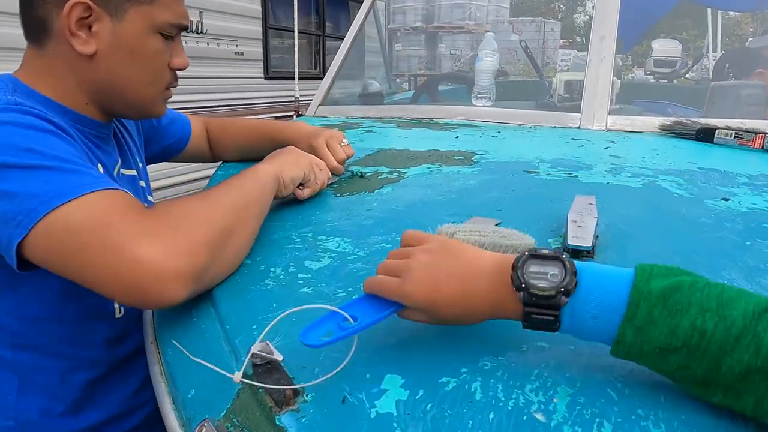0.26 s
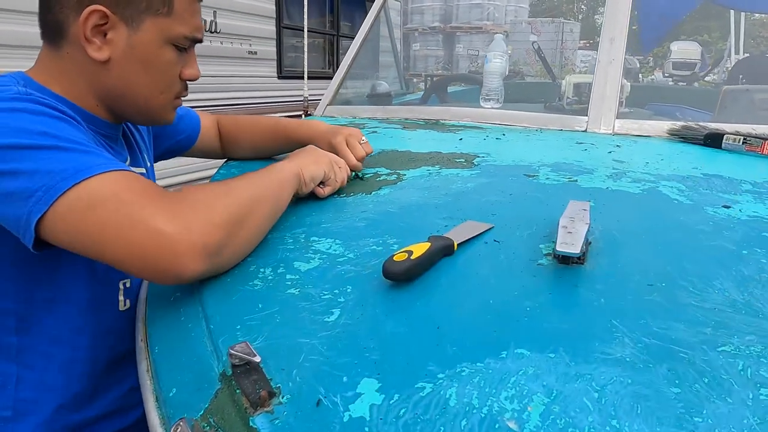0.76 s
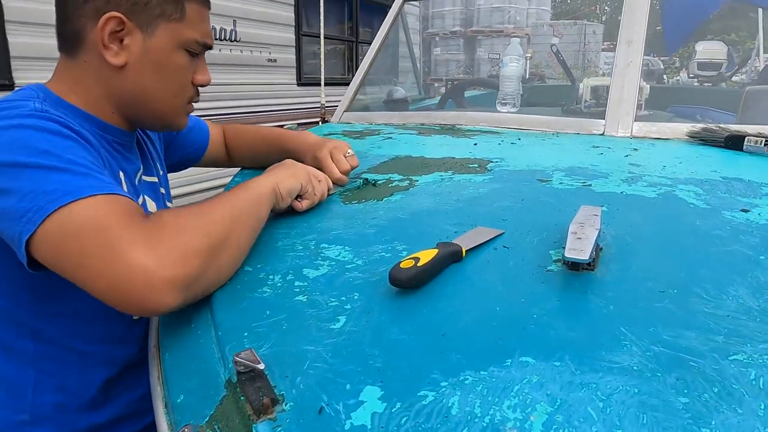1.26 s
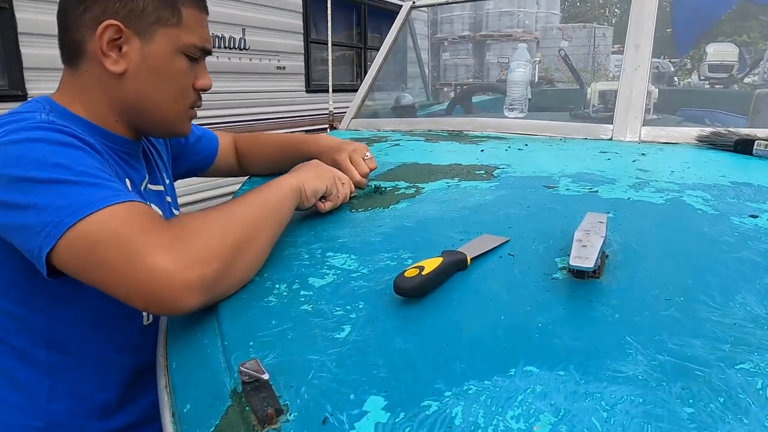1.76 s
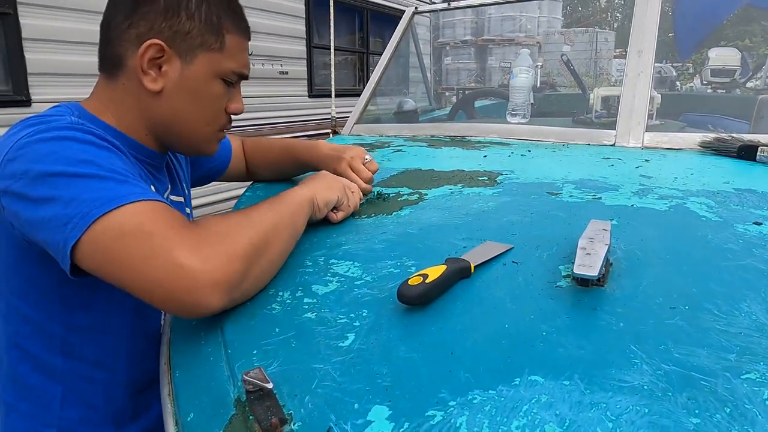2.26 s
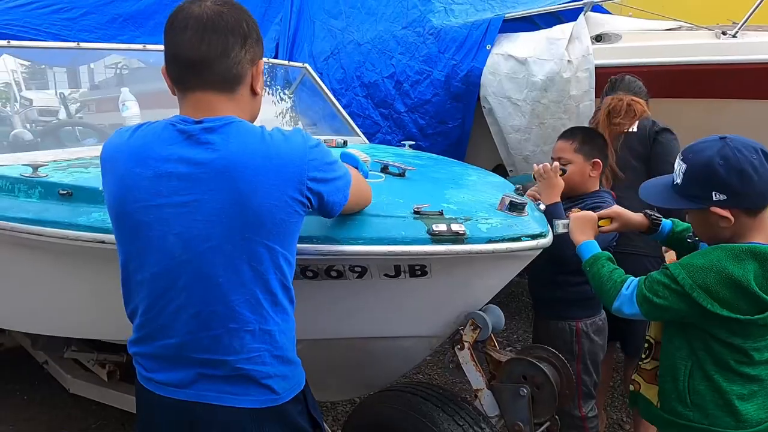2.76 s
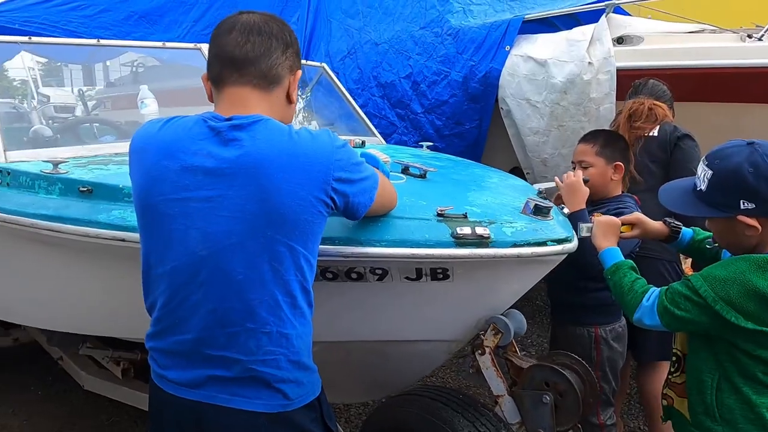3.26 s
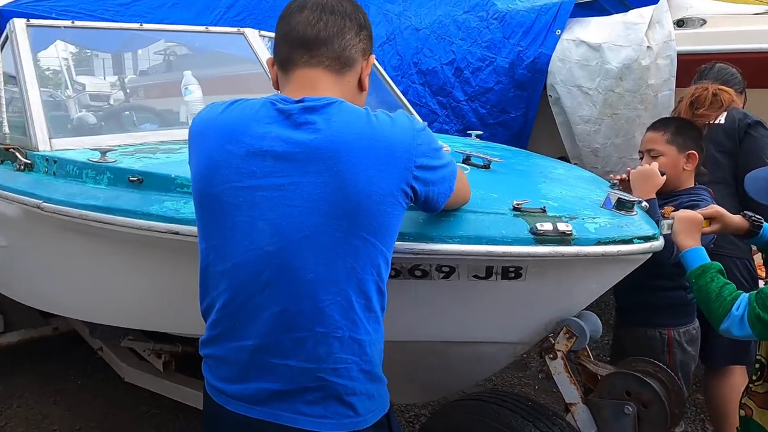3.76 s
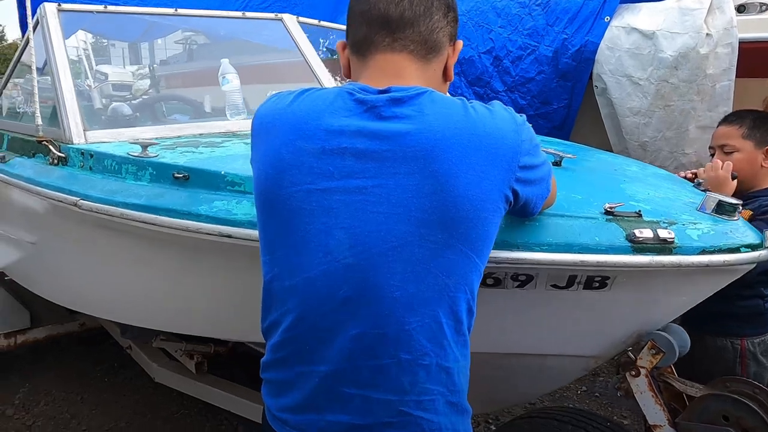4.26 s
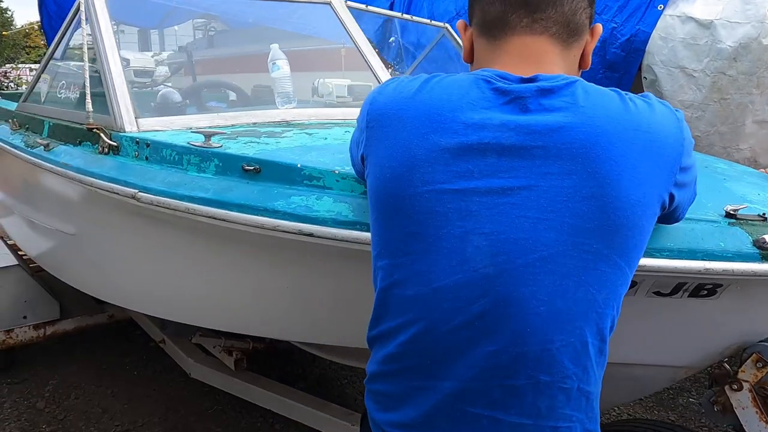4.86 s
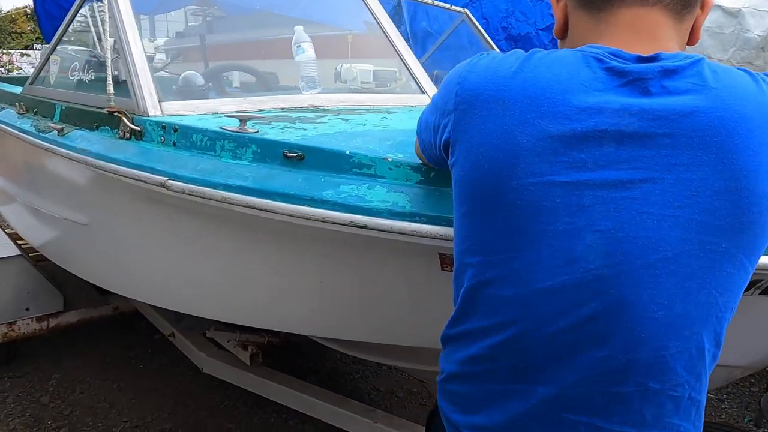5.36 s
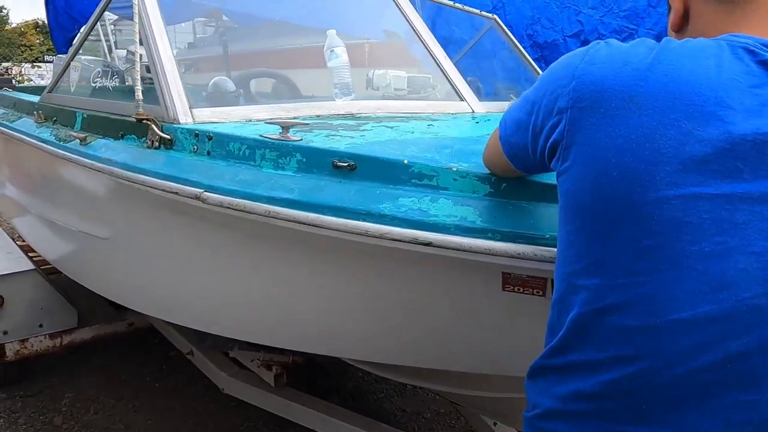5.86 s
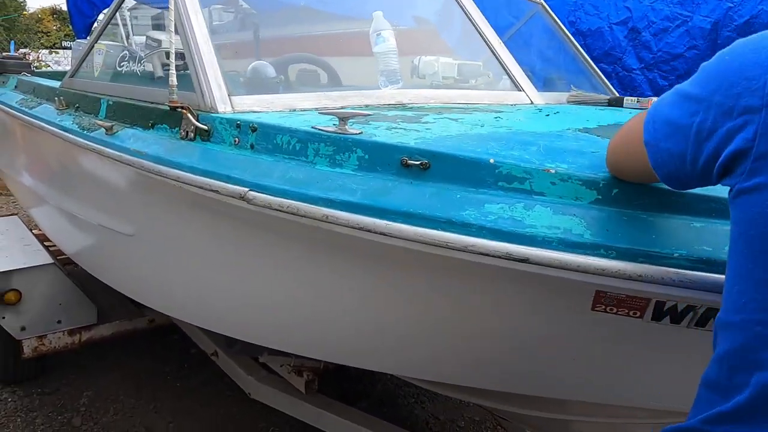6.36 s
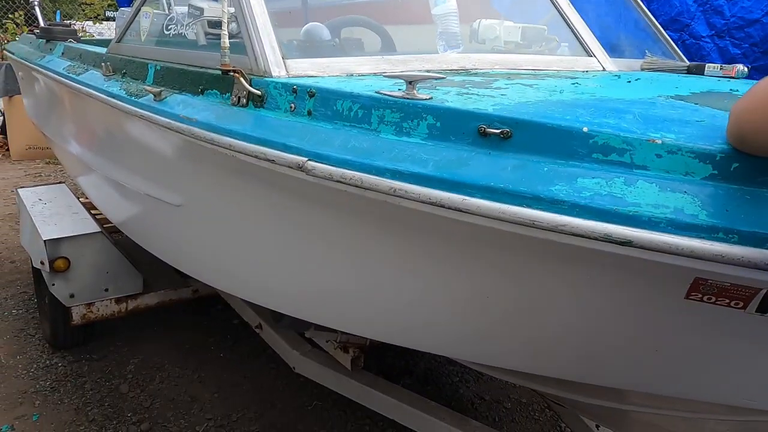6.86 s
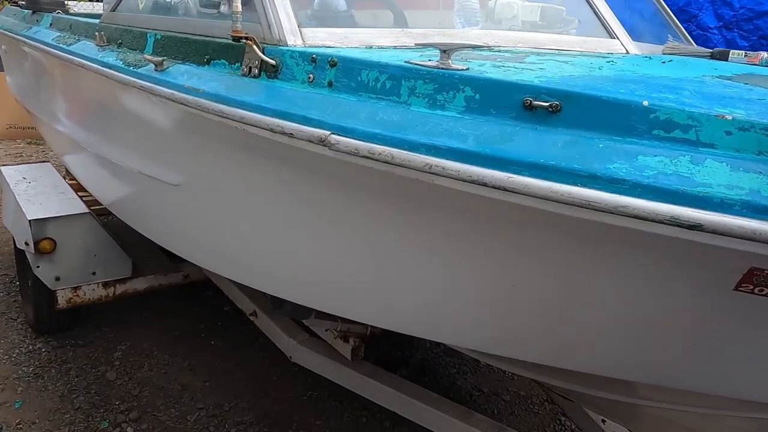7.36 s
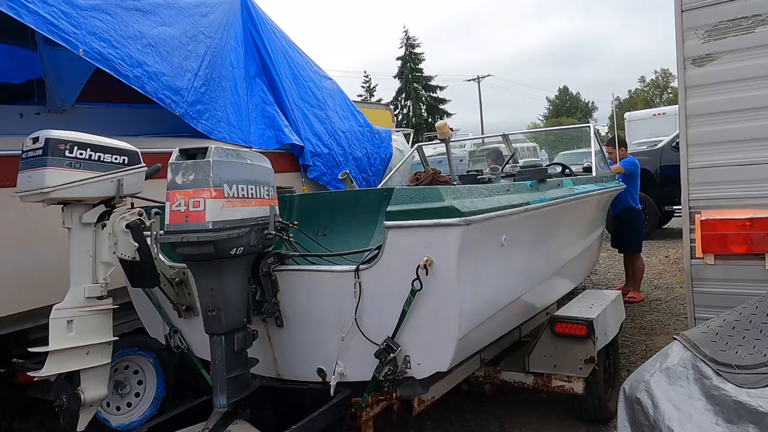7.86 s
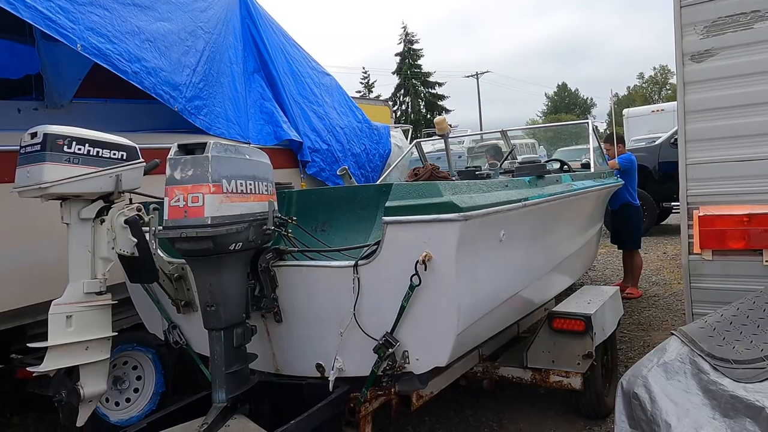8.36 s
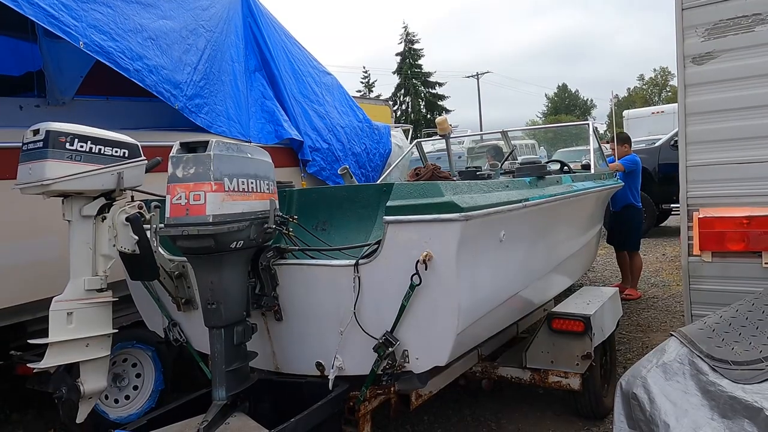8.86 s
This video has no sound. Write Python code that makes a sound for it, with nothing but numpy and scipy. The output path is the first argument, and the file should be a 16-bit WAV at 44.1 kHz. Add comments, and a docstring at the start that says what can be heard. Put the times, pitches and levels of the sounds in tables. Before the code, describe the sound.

Dry, crackly hand scraping on hollow fibreglass outdoors, briefly cut by silence, continues softer with one knock, then fainter from the stern over traffic.

```python
"""From the start traffic rumbles and hums over an outdoor yard: shaped noise and sliding sines.
Beside the hands, a blade scrapes old paint off a fibreglass boat deck: click noise gated by strokes,
with cracks of flakes, brief singing and booming tones and stick-slip judder, all through resonances.
After a short silence, from behind the worker: softer scraping and a knock on the hollow hull, as ringing noise.
After a brief dip in level, from the stern: faint scraping, low booms and a differently coloured tyre wash."""
import sys
import numpy as np
from scipy import signal
from scipy.fft import rfft, irfft, next_fast_len
from scipy.io import wavfile
from scipy.ndimage import uniform_filter1d

SR = 44100
rng = np.random.default_rng(int(sys.argv[2]) if len(sys.argv) > 2 else 0)


def bounce(signal):
    """Save signal as a 16-bit WAV file at the path given by the first command-line argument."""
    frames = np.transpose(np.atleast_2d(signal))
    limited = np.clip(frames, -1, 1)
    pcm = np.round(limited * 32767).astype(np.int16)
    wavfile.write(sys.argv[1], SR, pcm)


N = 402187
SIZE = next_fast_len(N, True)
TIME_S = np.arange(N) / SR
BIN_HZ = np.fft.rfftfreq(SIZE, 1 / SR)

# All levels are relative: each layer adds its own gain.
# Traffic rumble spectrum. Each row: frequency in Hz, density in dB per Hz.
RUMBLE_SPECTRUM_DB = [(8, -16.5), (14, -6.5), (28, -3), (40, -4), (48, 4), (55, 7), (63, 0.5), (72, 3.5),
                      (84, 3.5), (95, -6), (112, -6.5), (140, -15.5), (220, -25), (500, -82.5)]
# Rumble level. Each row: time in seconds, level in dB.
RUMBLE_LEVEL_DB = [(0, -33.5), (2.1, -40), (2.25, -34.5), (2.65, -27), (3.2, -27), (3.7, -30), (5.3, -31),
                   (6.3, -28.5), (7.8, -28), (7.92, -35), (8.5, -32), (8.7, -33.5), (9.1, -34.5)]
# Tyre wash spectra at the three places. Each row: frequency in Hz, density in dB per Hz.
WASH_DECK_DB = [(88, -7.5), (150, -3), (198, -12.5), (363, -11), (424, -21.5), (495, -13), (642, -12),
                (737, -12.5), (955, -10), (1220, -13.5), (1370, -17.5), (9380, -58.5), (12200, -58.5),
                (20600, -120)]
WASH_SIDE_DB = [(88, -17.5), (150, -5), (300, -5.5), (400, -6), (520, -8), (720, -4.5), (1010, -5.5),
                (1750, -18), (3200, -28.5), (5700, -38.5), (8000, -46.5), (9400, -51), (11500, -86),
                (16000, -110)]
WASH_STERN_DB = [(88, -31), (150, -12.5), (175, -11.5), (235, -10), (285, -15.5), (350, -12), (389, -10.5),
                 (478, -17), (559, -13.5), (818, -11), (907, -5.5), (1840, -21), (4500, -43.5), (9380, -66),
                 (12200, -93), (20600, -120)]
# Tyre wash level. Each row: time in seconds, level in dB.
WASH_LEVEL_DB = [(0, -38), (1.2, -39), (2.3, -39.5), (2.6, -38), (3.7, -41.5), (6, -42.5), (6.8, -42.5),
                 (7.83, -43), (7.9, -38), (8.5, -40), (9.1, -39)]
# Distant hums and whines. Each row: start and length in seconds, first and last pitch in Hz, level in dB.
HUM_ROWS = [(-.15, 0.59, 98, 104.3, -38), (0.501, 0.73, 121, 111.6, -36), (1.653, 0.4, 84.1, 84.8, -35.5),
            (2.551, 0.95, 773, 786, -49), (3.298, 0.65, 267.6, 261, -40), (5.018, 0.27, 716, 724, -43),
            (6.211, 0.4, 232.7, 222, -49), (6.945, 0.96, 216.8, 206.5, -46.5), (7.919, 0.11, 727, 721, -45),
            (8.409, 0.063, 720, 716, -47), (7.846, 0.61, 82.04, 80, -43), (8.421, 0.9, 80.44, 81.8, -30),
            (8.5, 0.98, 167.5, 164.5, -49.5)]
# Pushes of the blade. Each row: start and length in seconds, level in dB, build-up from start to end in dB,
# extra top treble in dB, extra deck body in dB.
STROKE_ROWS = [(-.02,.11,-43.5,-15,5.5,5), (0.19,.26,-47.5,0,-2,1), (0.624,0.093,-35,4,-3.5,1.5),
               (0.724,0.052,-35.5,6,3,1.5), (0.751,0.06,-32.5,5,1,1), (0.803,.025,-52,-7.5,3,7.5),
               (1.009,0.11,-42.5,-2,-6,1.5), (1.221,0.05,-53,4,4,10), (1.324,0.045,-32,-6,-6.5,0),
               (1.37,0.024,-43,-6,3,5), (1.401,0.075,-34.5,-3,0,0), (1.463,0.067,-31.5,9,-0.5,-1),
               (1.533,0.099,-41,-5,2,4), (1.754,.12,-46,-5,-1.5,3.5), (1.968,0.036,-47,-3,10,10),
               (2.153,0.0066,-36,-2,-7,1.5), (2.176,0.0078,-37.5,-3,5,-1), (2.204,0.031,-38.5,-2,-2,2.5),
               (2.27,0.071,-28.5,6,1.5,1.5), (2.348,0.062,-37,-18,2,-3.5), (2.721,0.1,-51,0,-7,3),
               (2.865,0.072,-47.5,-4,-6,4), (3.042,0.03,-50,8,1.5,-1), (3.252,0.026,-45,-4,1,-3),
               (3.469,0.074,-52.5,-6,0.5,-3), (3.769,0.043,-47,0,-7,-1.5), (4.05,0.12,-50,1,-10,-3),
               (4.166,0.047,-50.5,4,-8,4.5), (4.304,0.08,-45.5,-4,-1,0), (4.457,0.12,-55.5,-4,-5,1.5),
               (4.58,0.13,-46.5,-18,-7.5,-4), (4.695,0.082,-58,-3,1,-1), (4.78,0.11,-52.5,10,2,0),
               (4.93,0.087,-57,0,5,7), (5.003,0.2,-48,2,0.5,2), (5.187,0.081,-51.5,-6,-3,0),
               (5.36,0.039,-45,8,2,3), (5.458,0.025,-46,-3,-10,3.5), (5.49,0.053,-57,0,6,8),
               (5.586,0.069,-47.5,-8,1,1), (5.784,.13,-51.5,-6,3,-6), (6.048,0.054,-53,16,-23,6),
               (6.255,0.069,-49.5,-4,5,2), (6.388,.027,-50.5,-11,-2,5), (6.477,0.072,-49,-9,2.5,0.5),
               (6.651,.097,-50.5,-3,-5,2.5), (6.745,0.053,-49.5,3,4,4), (6.985,0.068,-46.5,-1.5,3.5,6),
               (7.108,.065,-62.5,0,7,12), (7.24,0.062,-41,4.5,3,-1.5), (7.396,.04,-63,-6,7,14),
               (7.518,0.079,-45.5,-2,-3,2), (7.973,0.073,-52.5,-1,-3,8), (8.135,0.098,-48.5,9.5,-0.5,-1),
               (8.215,0.1,-53.5,7,4.5,4.5), (8.32,.08,-64,-6,-7,10), (8.52,0.033,-59,-4,-20,10),
               (8.606,0.046,-55,-2,-19,4)]
# Blade dragging lightly between strokes. Each row: time in seconds, level in dB.
DRAG_LEVEL_DB = [(0, -65), (1.7, -55.5), (2.4, -71), (3.8, -72), (4.5, -61), (6.1, -58), (6.6, -68.5),
                 (7.6, -60.5), (8.4, -70.5), (9.1, -62.5)]
# Blade's rasp before its resonances. Each row: frequency in Hz, density in dB per Hz.
RASP_SPECTRUM_DB = [(40, -15.5), (100, 2.5), (170, 8.5), (290, 0.5), (400, 2.5), (500, 0.5), (620, 0.5),
                    (900, 1), (1500, 0.5), (2400, -7), (4200, -7), (6200, -11.5), (9300, -18),
                    (10000, -25.5), (13000, -34), (15500, -51)]
# Resonances of deck and blade. Each row: frequency in Hz, width in Hz, lift in dB.
MODE_ROWS = [(750, 89, 0.5), (804, 110, 0.5), (1250, 13, 1.5), (2000, 100, 2), (2700, 74, 4),
             (3840, 620, 1.5), (4400, 160, 3.5), (5060, 210, 1), (7300, 260, 6), (8060, 930, 6)]
# Shading by the worker's body. Each row: frequency in Hz, gain in dB.
SHADE_DB = [(150, -3.5), (250, 2), (400, 2), (800, 4), (1600, 0.5), (2400, 2.5), (3200, 3.5), (3900, 0.5),
            (4400, -1.5), (5700, 1), (8500, -5.5), (10500, -2), (13000, 0.5)]
# Deck's lowest drum modes. Each row: frequency in Hz, density in dB per Hz.
DRUM_SPECTRUM_DB = [(70, -37.5), (130, 0.5), (160, -7), (240, -0.5), (330, -32.5), (600, -81.5)]
# Short cracks: flakes snapping off, but only faint ticks of no given source at 3.254 and 8.528 seconds.
# Each row: time in seconds, level in dB, decay time in ms, pitch in Hz, extra bass in dB.
CRACK_ROWS = [(0.0312,-14.5,4.7,2730,-13.5), (.061,-33,2,8000,-13), (.178,-30,2.1,2000,-15),
              (0.226,-39,1.5,3300,0), (.282,-42.5,3.8,950,22.5), (.322,-26,3.2,4550,1),
              (.36,-34,1.5,7800,-6), (0.374,-38,2,8000,-1), (.387,-20,1,4740,-3), (0.416,-27,.9,4580,3),
              (.509,-29,1.4,4400,-2), (.609,-27,4,4600,2.5), (0.6347,-28,2.5,2100,-2),
              (0.658,-35,1.9,4000,4), (.664,-24,3.4,3800,-3), (.68,-28,1.8,5000,0), (0.69,-23,3.4,4180,-4),
              (.699,-24.5,2.5,5300,4), (0.7157,-24.5,3.1,7040,3), (.736,-23.5,2.7,7500,1),
              (0.753,-31,2,3880,-3), (0.769,-28,3.6,3880,-9), (0.786,-28.5,1.8,4200,-7),
              (0.7926,-16.5,5.3,3770,-8.5), (0.8015,-17.5,4,3900,-5.5), (.806,-23,2.6,3300,7),
              (.858,-44,1.2,8000,-5), (.998,-20,1.3,4130,9.5), (1.246,-31.5,2.7,6960,-13),
              (1.359,-28,1.8,6500,0), (1.418,-30,2.2,4300,-10), (1.443,-30,2.5,7800,-9),
              (1.464,-15.5,1.9,7800,-4), (1.467,-24,1.6,7800,-6), (1.493,-23,3.5,3800,-10),
              (1.5173,-19.5,6.1,3960,-5), (1.53,-22,5.9,7000,-2), (1.551,-32,1.8,4300,3),
              (1.58,-37,1.5,6000,-5), (1.59,-25,1.5,8500,-9), (1.607,-21.5,2.1,4550,-13),
              (1.66,-38,5.7,1930,9), (1.677,-34,1,8000,-10), (1.76,-42.5,6,940,20.5),
              (1.961,-31.5,8.2,6000,-8), (1.971,-32.5,13,6030,11), (2.174,-26.5,4.6,3760,1),
              (2.1949,-19,3.2,3420,-0.5), (2.209,-28,2.1,1900,9), (2.215,-24,3.6,3220,3.5),
              (2.2717,-27.5,4.7,3000,6.5), (2.289,-30,2.7,5200,4.5), (2.301,-22,2.5,3000,6),
              (2.3125,-20.5,2.4,2700,1.5), (2.331,-24.5,2.5,3950,0), (2.343,-19,4.5,7560,-5.5),
              (2.37,-28.5,1.4,3300,4), (2.736,-39.5,5.5,3000,-8), (2.787,-45,4,3500,1),
              (3.254,-32.5,5.9,2600,-1.5), (3.476,-36.5,5.6,3000,-9), (4.085,-48,5.1,4800,10),
              (4.597,-42,5.9,5000,-4), (4.859,-43,5.3,3800,2), (5.458,-39.5,5.4,2600,-4),
              (5.843,-38,5.1,5000,-2), (6.341,-44.5,9.9,6000,-8), (8.195,-39,4.1,3520,5),
              (8.528,-50,4.4,1100,11)]
# Blade singing. Each row: middle and length in seconds, first and last pitch in Hz, level in dB.
SING_ROWS = [(.345,0.072,4700,4600,-48), (.782,0.061,4060,3670,-35), (1.5,.1,7270,8100,-41),
             (2.21,.065,3770,3150,-39), (2.332,.07,7200,7300,-35.5), (2.315,0.12,3600,4250,-37.5),
             (2.305,.085,4950,5440,-43), (2.305,0.12,1450,1342,-31.5), (2.305,0.091,847,978,-28.5),
             (4.1,0.062,4840,5000,-55.5), (5.15,0.056,7960,7960,-53), (5.469,.04,5300,5300,-55),
             (7.277,0.065,7760,7760,-53)]
# Deck booming as it is leant on and let go. Each row: middle and length in seconds, first and last pitch
# in Hz, level in dB.
BOOM_ROWS = [(.705,0.19,161.4,175.6,-26.5), (.82,.06,236,170,-26.5), (1.51,.06,177,167,-28.5),
             (2.235,0.087,160.5,89.7,-31), (2.36,0.082,193.3,141,-30), (5.17,0.2,190.7,168,-43),
             (8.175,.15,237,210.5,-34), (8.205,0.15,389,373,-39), (8.28,0.19,311,285,-40),
             (8.37,.13,235,180,-41)]
# Blade juddering on hard pushes. Each row: middle and length in seconds, first and last rate in Hz, level in dB.
JUDDER_ROWS = [(0.777,.06,555,693,-50), (1.338,.061,1304,1420,-31), (2.216,.09,621.6,595,-28.5),
               (2.324,.13,621.4,699,-31.5), (3.26,.06,785,718,-41), (5.054,.13,2410,2260,-40.5),
               (5.46,.06,2600,2480,-43.5), (7.273,.062,779,827,-40.5)]
# Knock on the hull with its rebound. Each row: time in seconds, level in dB.
KNOCK_ROWS = [(2.884, -16.5), (2.889, -21), (2.911, -29)]
# Hull's ring. Each row: frequency in Hz, density in dB per Hz.
HULL_SPECTRUM_DB = [(60, 2.5), (150, -3.5), (350, 0), (520, -2.5), (850, 3.5), (1300, -7.5), (2100, -17.5),
                    (3000, -13.5), (5500, -22), (9000, -30), (14000, -59)]
# Hull's decay. Each row: frequency in Hz, time to fall 60 dB in seconds.
HULL_T60_S = [(150, 0.57), (800, 0.22), (2000, 0.12), (8000, 0.02)]
# Difference of diffuse sound between the microphones. Each row: frequency in Hz, side minus mid in dB.
DIFFUSE_SIDE_DB = [(60, -51), (100, -47), (180, -40.5), (320, -19.5), (550, -15), (970, -10), (1700, -10.5),
                   (2900, -5.5), (5100, -8.5), (8900, -7), (13000, -11)]
# Image closing to the centre, then opening. Each row: time in seconds, side gain in dB.
SIDE_GAIN_DB = [(0, 3.5), (2.4, 3), (2.6, -48), (5.7, -53), (5.9, -29.5), (7, -1.5), (7.7, 0.5), (9.1, 1)]
# Lag of direct sound at the left microphone, before the side gain. Each row: frequency in Hz, lag in rad.
LEFT_LAG_RAD = [(200, 0), (800, .1), (1600, 0.38), (3000, .4), (5500, .15), (9000, 0.0065)]

DECK_END_S, SIDE_START_S, STERN_START_S = 2.405, 2.578, 7.862  # changes of listening place
DIP_FALL_S, DIP_RISE_S = 0.037, 0.031
EDGE_NEAR, EDGE_FAR = 3.04, 2.8  # steepness of stroke ends; reflections soften it from further off
CORE_NEAR, CORE_FAR = 0.95, 0.79  # share of a stroke held near full force
DRUM_S, DRUM_DB_PER_OCTAVE = 0.16, 5.5  # shorter pushes drum less
HUM_FADE_SHARE, HUM_WAVER_SHARE = 0.18, 0.003  # of length at each end; of pitch
LEFT_SHADE = 0.12  # left loss in proportion to its lag
BAND_LIMIT_HZ = 15500


def gain_of(db):
    """Decibels to gain."""
    return 10 ** (np.asarray(db) / 20)


def evened(x):
    """Scales to rms 1."""
    return x / np.sqrt(np.mean(x ** 2) + 1e-20)


def read(points, hz):
    """Reads a frequency table on a log-frequency axis."""
    table_hz, value = np.transpose(points)
    return np.interp(np.log(hz + 1), np.log(table_hz + 1), value)


def curve(rows):
    """Reads a time table at every sample."""
    return np.interp(TIME_S, *np.transpose(rows))


def shaped(x, db):
    """Zero-phase filter from a dB value per bin."""
    return irfft(rfft(x, SIZE) * gain_of(db), SIZE)[:N]


def noise(points):
    """Noise of rms 1 with the given spectrum."""
    return evened(shaped(rng.standard_normal(N), read(points, BIN_HZ)))


def wander(rate_hz):
    """Smooth random signal of rms 1, mostly slower than the given rate."""
    spectrum = rfft(rng.standard_normal(SIZE)) * np.exp(-(BIN_HZ / rate_hz) ** 2)
    return evened(irfft(spectrum, SIZE)[:N])


def add(mix, s, sound):
    """Mixes a sound in at time s."""
    part = mix[round(s * SR):][:len(sound)]
    part += sound[:len(part)]


def ring(x, colour_db, size=4096):
    """Minimum-phase filter with response colour_db(hz): resonances ring after each click."""
    response_db = np.maximum(colour_db(abs(np.fft.fftfreq(size, 1 / SR))), -100)
    log_gain = np.log(gain_of(response_db))
    taps = np.fft.ifft(np.exp(np.conj(signal.hilbert(log_gain)))).real
    return signal.oaconvolve(x, taps[:size // 2])[:N]


def hull_tail(size=16384):
    """Dense ring of the hull, of energy 1; the treble dies first."""
    hz, t_s, z = signal.stft(rng.standard_normal(size), SR, nperseg=256)
    decay_db = -60 * t_s / read(HULL_T60_S, hz)[:, None]
    tail = signal.istft(z * gain_of(decay_db), SR, nperseg=256)[1]
    return tail / np.linalg.norm(tail)


def traffic(rumble_db=2.5, flutter_db=1):
    """Low engine rumble under a tyre wash whose colour changes with the listening place."""
    rumble = noise(RUMBLE_SPECTRUM_DB)
    rumble /= np.sqrt(uniform_filter1d(rumble ** 2, size=11025))  # the engines pull steadily
    rumble *= gain_of(rumble_db + curve(RUMBLE_LEVEL_DB))
    places = [TIME_S < DECK_END_S, TIME_S < STERN_START_S]
    wash = np.select(places, [noise(WASH_DECK_DB), noise(WASH_SIDE_DB)], noise(WASH_STERN_DB))
    return rumble + wash * gain_of(curve(WASH_LEVEL_DB) + flutter_db * wander(rate_hz=4.8))


def hums(flutter_db=-0.1):
    """Tones of far vehicles: sines that fade in, slide and waver in pitch, and fade out."""
    out, drift, flutter = np.zeros(N), wander(rate_hz=26.0), wander(rate_hz=11)
    for start_s, length_s, first_hz, last_hz, db in HUM_ROWS:
        end_s = start_s + length_s
        at = np.flatnonzero((TIME_S >= start_s) & (TIME_S < end_s))
        to_end_s = np.minimum(TIME_S[at] - start_s, end_s - TIME_S[at])
        fade = np.sin(np.pi / 2 * np.clip(to_end_s / (HUM_FADE_SHARE * length_s), 0, 1)) ** 2
        hz = np.linspace(first_hz, last_hz, len(at)) * (1 + HUM_WAVER_SHARE * drift[at])
        tone = np.sqrt(2) * np.sin(2 * np.pi * np.cumsum(hz) / SR)
        out[at] += gain_of(db + flutter_db * flutter[at]) * fade * tone
    return out


def stroke_force(fidget_db=2.5):
    """Force at the blade's edge and tip, in the deck and on its drum modes; strokes swell and ease off."""
    drag = gain_of(curve(DRAG_LEVEL_DB) + fidget_db * wander(rate_hz=6.2))
    power = np.outer([1, 1, 1, 0], drag ** 2)
    for start_s, length_s, db, build_db, top_db, body_db in STROKE_ROWS:
        at = slice(max(int((start_s - length_s) * SR), 0), int((start_s + 2 * length_s) * SR))
        along = 2 * (TIME_S[at] - start_s) / length_s - 1  # -1 at the start, 1 at the end
        edge, core = (EDGE_NEAR, CORE_NEAR) if start_s < DECK_END_S else (EDGE_FAR, CORE_FAR)
        steep = edge * np.sqrt(length_s / 0.034)  # long strokes hold their force longer
        push = gain_of(db) / np.hypot(1, abs(along / core) ** steep)
        bite = push * gain_of(build_db * np.clip(along, -1, 1) / 2)
        drum_db = DRUM_DB_PER_OCTAVE * min(np.log2(length_s / DRUM_S), 0)
        forces = [bite, bite * gain_of(top_db), bite * gain_of(body_db), push * gain_of(drum_db)]
        power[:, at] += np.array(forces) ** 2
    return np.sqrt(power)


def grains(per_s, spread_db):
    """Tiny fractures of the paint: random clicks, a few of them large."""
    size_db = spread_db * np.minimum(rng.exponential(1, N), 3)
    clicks = gain_of(size_db) * rng.choice([-1, 1], N)
    return evened(clicks * (rng.random(N) < per_s / SR))


def travelling(x, near_patchy_db=5.0, far_patchy_db=2.5):
    """The moving contact favours some deck modes and misses others; from further off this evens out."""
    z = signal.stft(x, nperseg=512, noverlap=384)[2]
    patches = uniform_filter1d(rng.standard_normal(z.shape), size=3, axis=0)
    patches = uniform_filter1d(patches, size=18, axis=1)
    frame_s = np.linspace(0, TIME_S[-1], z.shape[1])
    patchy_db = np.where(frame_s < DECK_END_S, near_patchy_db, far_patchy_db)
    lift = gain_of(patchy_db * np.minimum(evened(patches), 1))
    lift /= np.sqrt(np.mean(lift ** 2, axis=0))
    return signal.istft(z * lift, nperseg=512, noverlap=384)[1][:N]


def rubbing(edge_force, tip_force, deck_force, split_hz=1700, top_hz=5500):
    """Stick-slip chatter bunches the fractures; the blade gives the treble and the deck the body."""
    chatter = evened(gain_of(2.4 * np.clip(wander(rate_hz=280), -1.7, 1.7)))
    fractures = grains(per_s=9000, spread_db=3)
    edge, tip, deck = np.array([edge_force, tip_force, deck_force]) * chatter * fractures
    body = shaped(deck - edge, -20 * np.log10(1 + (BIN_HZ / split_hz) ** 4))
    fizz = shaped(tip - edge, -20 * np.log10(1 + (top_hz / (BIN_HZ + 1)) ** 4))
    return travelling(edge + body + fizz)


def rasp_colour(hz, lift=1):
    """Broad rasp lifted at each resonance of deck and blade."""
    peaks_db = sum(db / (1 + (2 * (hz - f) / width) ** 2) for f, width, db in MODE_ROWS)
    return read(RASP_SPECTRUM_DB, hz) + lift * peaks_db


def drumming(push, level_db=3):
    """Long pushes set the deck drumming, which carries only to the place beside the hands."""
    return gain_of(level_db) * push * (TIME_S < DECK_END_S) * noise(DRUM_SPECTRUM_DB)


def scraping(level_db=11.0, near_tail_db=-13, far_tail_db=-7, far_lift=0.57):
    """Strokes and cracks sound through the deck; further off, resonances blur and the hull is heard more."""
    edge, tip, deck, push = stroke_force()
    jolts, bursts = stick_slip()
    drive = gain_of(level_db) * (bursts * rubbing(edge, tip, deck) + jolts + cracking())
    near = ring(drive * (TIME_S < DECK_END_S), rasp_colour)
    far = ring(drive * (TIME_S >= DECK_END_S), lambda hz: rasp_colour(hz, far_lift) + read(SHADE_DB, hz))
    tail_feed = gain_of(near_tail_db) * near + gain_of(far_tail_db) * far
    tail = signal.oaconvolve(tail_feed, hull_tail())[:N]
    return near + far + tail + ringing() + drumming(push)


def cracking(level_db=-3, lift_db=6.5, octaves=0.35, reach=2.1, rise_ms=0.088, split_hz=1700,
             air_db=6, air_hz=10000, size=4096):
    """Noise bursts that start at once and die in a few milliseconds around a pitch, as a flake snapping does."""
    out, age_ms = np.zeros(N), np.arange(size) / SR * 10 ** 3
    for s, db, decay_ms, pitch_hz, bass_db in CRACK_ROWS:
        swell = 1 - np.exp(-age_ms / rise_ms)
        crack = rng.choice([-1, 1], size) * np.exp(-age_ms / decay_ms) * swell

        def colour_db(hz):
            """Bass shelf, peak at the pitch and air, with a roll-off above the pitch."""
            bass = bass_db / (1 + (hz / split_hz) ** 2)
            peak = lift_db * np.exp(-(np.log2((hz + 1) / pitch_hz) / octaves) ** 2)
            air = air_db / (1 + (air_hz / (hz + 1)) ** 10)
            return bass + peak + air - 10 * np.log10(1 + (hz / (reach * pitch_hz)) ** 6)

        add(out, s, gain_of(db + level_db) * ring(crack, colour_db))
    return out


def partial(length_s, first_hz, last_hz, width_hz):
    """A rough, narrow tone that swells, slides and fades: low-passed noise on a sliding carrier."""
    count = int(length_s * SR)
    low_pass = signal.butter(2, width_hz / 2, fs=SR)
    feed = signal.lfilter(*low_pass, rng.standard_normal((2, SR)))[:, -count:]
    phase = 2 * np.pi * np.cumsum(np.linspace(first_hz, last_hz, count)) / SR
    return evened(feed[0] * np.cos(phase) + feed[1] * np.sin(phase)) * np.hanning(count)


def ringing(level_db=-1, sing_width_hz=170, boom_width_hz=35):
    """The blade sings briefly, its pitch sliding as it flexes, or the deck booms at a mode of its own."""
    out = np.zeros(N)
    for rows, width_hz in (SING_ROWS, sing_width_hz), (BOOM_ROWS, boom_width_hz):
        for middle_s, length_s, first_hz, last_hz, db in rows:
            tone = partial(length_s, first_hz, last_hz, width_hz)
            add(out, middle_s - length_s / 2, gain_of(db + level_db) * tone)
    return out


def stick_slip(level_db=-12, jitter=0.06, slip_share=0.38, soft_hz=900, burst_share=0.65):
    """At a near-steady rate, each slip jolts the deck and tears off a burst of paint."""
    jolts, bursts, unsteady = np.zeros(N), np.ones(N), wander(rate_hz=240)
    low_pass = signal.butter(1, soft_hz, fs=SR)
    for middle_s, length_s, first_hz, last_hz, db in JUDDER_ROWS:
        at = np.flatnonzero(abs(TIME_S - middle_s) < length_s / 2)
        rate_hz = np.linspace(first_hz, last_hz, len(at)) * (1 + jitter * unsteady[at])
        turns = np.cumsum(rate_hz) / SR
        slip, swell = np.exp(-(turns % 1) / slip_share), np.hanning(len(at))
        jolt = evened(signal.lfilter(*low_pass, slip - slip.mean()))
        jolts[at] += gain_of(db + level_db) * swell * jolt
        bursts[at] *= np.sqrt(1 + burst_share * swell * (evened(slip) ** 2 - 1))
    return jolts, bursts


def knock(level_db=-6, rise_ms=1.4, size=512):
    """A few quick, soft blows set the hollow hull ringing."""
    out = np.zeros(N)
    for s, db in KNOCK_ROWS:
        blow = ring(hull_tail(), lambda hz: read(HULL_SPECTRUM_DB, hz))
        swell = 1 - np.exp(-TIME_S[:len(blow)] * 10 ** 3 / rise_ms)
        add(out, s, gain_of(db + level_db) * swell * blow / np.std(blow[:size]))
    return out


def scene(diffuse_db=0.0, work_diffuse_db=-7):
    """Two close microphones: alike in the bass, lag and shifting phase above; work less diffuse than traffic."""
    work, around = scraping() + knock(), traffic() + hums()
    mid = work + around
    lag = (1 - 1j * LEFT_SHADE) * read(LEFT_LAG_RAD, BIN_HZ) / 2
    direct = irfft(-1j * rfft(mid, SIZE) * lag, SIZE)[:N]
    scattered = -1j * rfft(around + gain_of(work_diffuse_db) * work, SIZE)
    diffuse = irfft(scattered * gain_of(diffuse_db + read(DIFFUSE_SIDE_DB, BIN_HZ)), SIZE)[:N]
    diffuse *= wander(rate_hz=79)
    side = (direct + diffuse) * gain_of(curve(SIDE_GAIN_DB))
    return np.array([mid + side, mid - side])


def record(dry):
    """A short silence and a brief dip part the three listening places; then the band limit."""
    first = np.clip((DECK_END_S - TIME_S) / 0.033, 0, 1) ** 1.5
    later = np.clip((TIME_S - SIDE_START_S) / 0.045, 0, 1)
    fall, rise = (STERN_START_S - TIME_S) / DIP_FALL_S, (TIME_S - STERN_START_S) / DIP_RISE_S
    dip = np.clip(np.maximum(fall, rise), 0.1, 1)
    soft_ends = signal.windows.tukey(N, 0.0005)
    low_pass = signal.firwin(511, BAND_LIMIT_HZ, window=("kaiser", 9), fs=SR)
    return signal.oaconvolve(dry * (first + later * dip) * soft_ends, low_pass[None], "same")


dry = scene()
out = record(dry)
bounce(out)
```